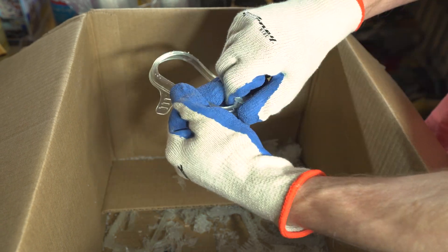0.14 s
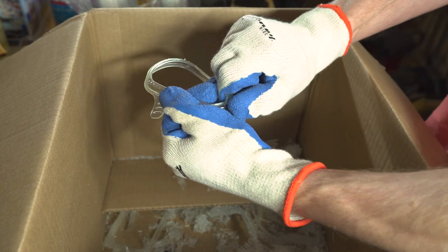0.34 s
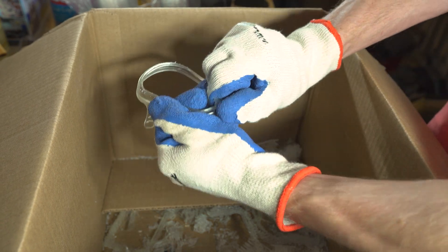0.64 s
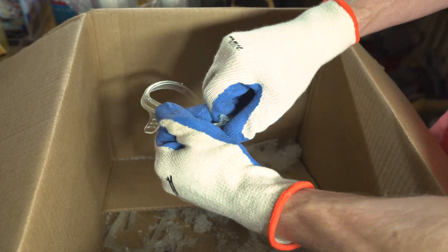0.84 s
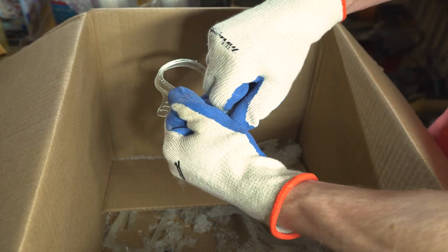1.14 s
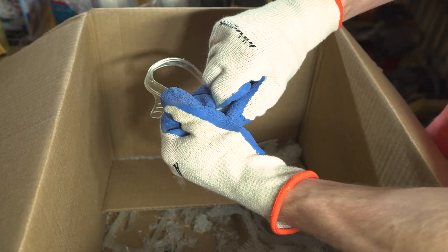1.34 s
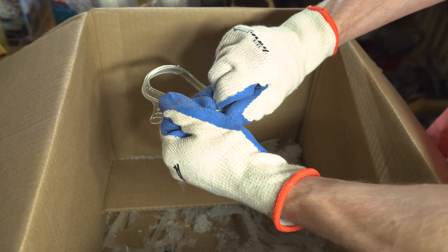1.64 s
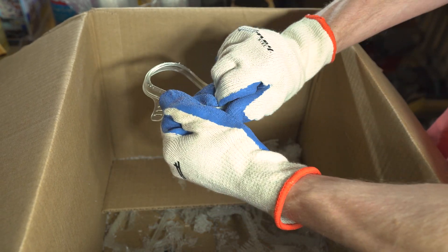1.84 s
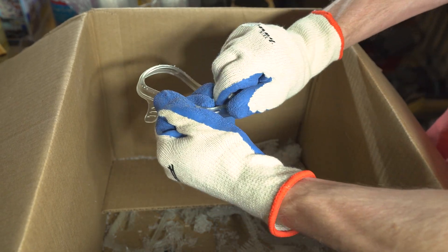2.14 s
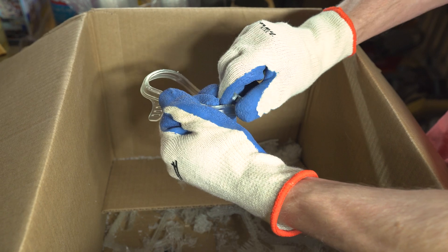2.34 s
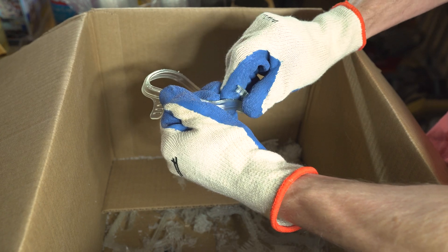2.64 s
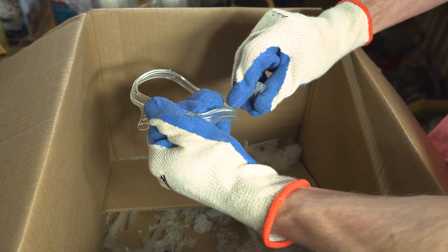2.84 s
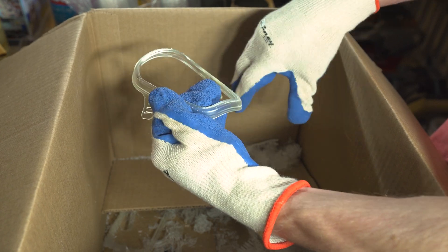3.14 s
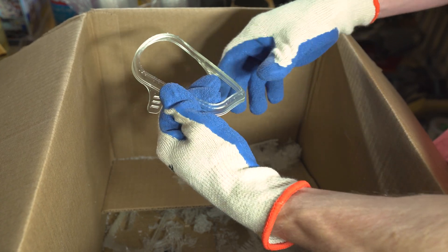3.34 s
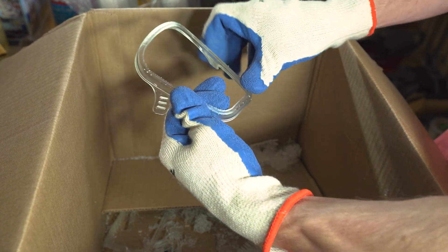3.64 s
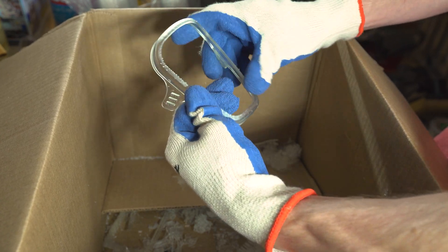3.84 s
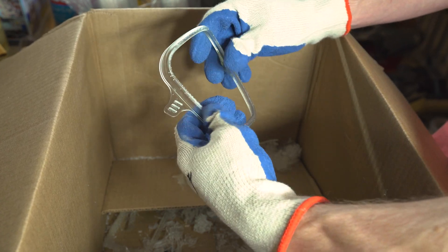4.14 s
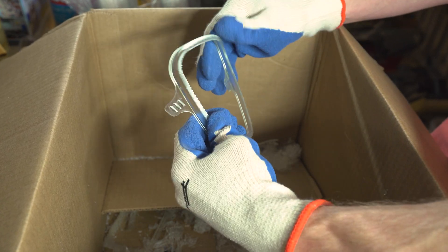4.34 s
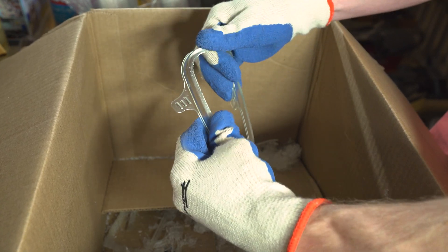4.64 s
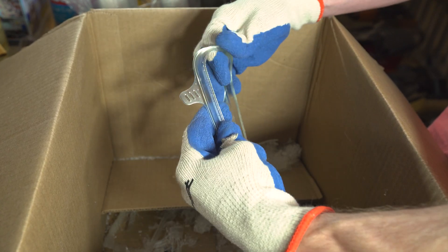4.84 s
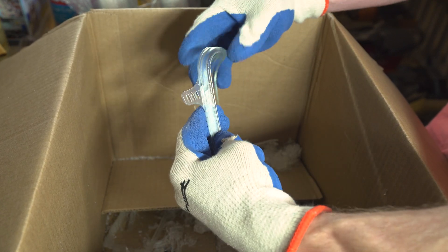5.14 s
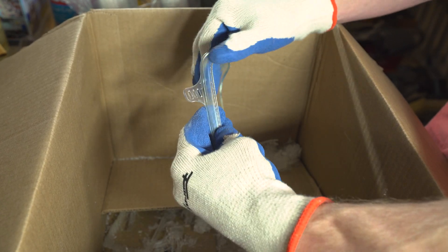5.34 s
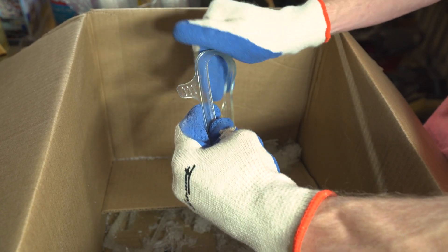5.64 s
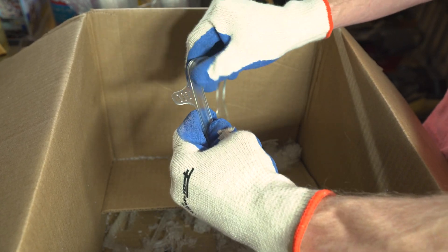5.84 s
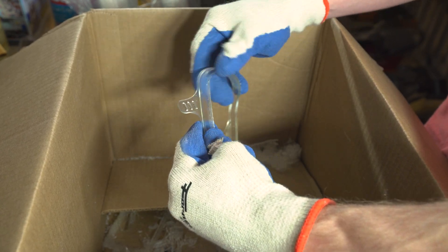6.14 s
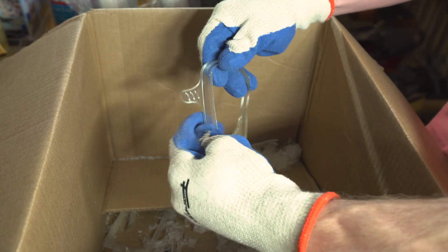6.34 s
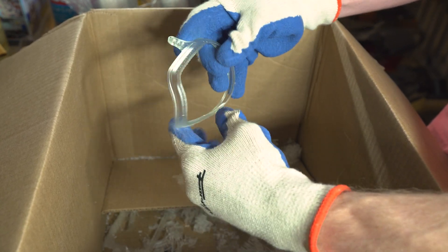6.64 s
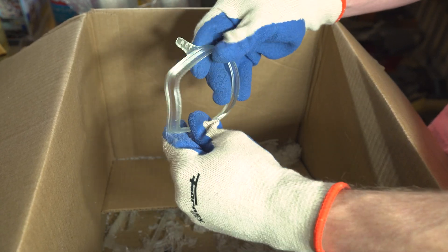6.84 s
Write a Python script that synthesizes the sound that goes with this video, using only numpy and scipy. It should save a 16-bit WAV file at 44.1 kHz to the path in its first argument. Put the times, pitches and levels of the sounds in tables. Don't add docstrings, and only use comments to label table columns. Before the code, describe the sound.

Hard resin supports are broken off by hand. Quiet scrap rattle opens; one high, needle-thin snap follows, then near two seconds a clustered crackle, later two bright snaps and small crunches, finally a lower knock-like crack. The rest is glove rubbing, squeaky-dry rustle and irregular plastic clicks, softer than the snaps. Heard close, with short reflections off box walls, a brief room tail and a quiet noise floor.

```python
import sys
import numpy as np
from scipy import signal
from scipy.io import wavfile
from scipy.ndimage import uniform_filter1d

SR = 44100
rng = np.random.default_rng(int(sys.argv[2]) if len(sys.argv) > 2 else 0)


def convert_level_to_amplitude(level_db):
    exponent = np.asarray(level_db, float) / 20
    return 10 ** exponent


def unload_wav(signal):
    wavfile.write(
        sys.argv[1],
        SR,
        np.round(np.clip(np.atleast_2d(signal).T, -1, 1) * 32767).astype(np.int16),
    )


N = 308655


def evened(x):
    return x / np.sqrt(np.mean(x ** 2) + 1e-20)


def read(points, hz):
    f, value = np.transpose(points)
    return np.interp(np.log(hz + 1), np.log(f + 1), value)


def colour(x, points):
    log_gain = np.log(convert_level_to_amplitude(read(points, abs(np.fft.fftfreq(4096, 1 / SR)))))
    taps = np.fft.ifft(np.exp(np.conj(signal.hilbert(log_gain)))).real[:1024]
    taps = taps.reshape((1,) * (x.ndim - 1) + (-1,))
    return signal.oaconvolve(x, taps, axes=-1)[..., :x.shape[-1]]


def level(starts, lengths, dbs, rise_s, t60):
    t, power = np.arange(0, N / SR + .002, .001), 0
    for start, length, db in zip(starts, lengths, dbs):
        rise = np.clip((t - start) / rise_s + .5, 0, 1)
        decay_db = 60 * np.maximum(t - start - length, 0) / t60
        power = power + (rise * convert_level_to_amplitude(db - decay_db)) ** 2
    return np.interp(np.arange(N) / SR, t, np.sqrt(power))


def likened(a, b, same):
    same = np.clip(same, 0, 1)
    return np.array([a, same * a + np.sqrt(1 - same ** 2) * b])


def grains(points, per_s, spread_db, smooth, same):
    sizes = convert_level_to_amplitude(spread_db * np.minimum(rng.exponential(1, N), 3.0))
    slips = sizes * (rng.random(N) < per_s / SR)
    slips = signal.lfilter([1], [1, -.97], slips)
    a, b = rng.standard_normal((2, N)) * (evened(slips) + smooth)
    return evened(colour(likened(a, b, same), points))


# frequency_hz, density_db (dB per Hz)
QUIET_TONE = [(12, -12), (20, -33), (44, 2.5), (130, -4.5), (337, -11), (399, -12.5), (527, -15),
              (1120, -18), (1480, -18), (2820, -22), (3440, -21.5), (7310, -25), (10800, -22), (16000, -29)]
# frequency_hz, left_right_likeness (0-1)
EAR_LIKENESS = [(60, 1.0), (180, 0.96), (550, 0.22), (1650, 0.028), (4970, 0.031), (15000, 0.089)]


def quiet():
    frames, hz = N // 256 + 5, np.fft.rfftfreq(1024, 1 / SR)
    a, b, c, d, patches = rng.standard_normal((frames, 513, 5)).T
    patches = evened(uniform_filter1d(uniform_filter1d(patches, 12, 0), 14, 1))
    z = likened(a + 1j * b, c + 1j * d, read(EAR_LIKENESS, hz)[:, None])
    z *= convert_level_to_amplitude(read(QUIET_TONE, hz)[:, None] + 0.51 * patches)
    noise = signal.istft(z, nperseg=1024, noverlap=768)[1][:, :N]
    return convert_level_to_amplitude(-54.5) * evened(noise)


# frequency_hz, t60_s
ROOM_T60 = [(300, 0.49), (1000, 0.33), (2500, 0.32), (4300, 0.42), (7000, 0.44), (12000, 0.46),
            (16000, 0.47)]


def room(x):
    taps = np.zeros((2, SR))
    at = np.arange(200, SR - 20, 12) + rng.integers(0, 12, (2, (SR - 221) // 12 + 1))
    np.put_along_axis(taps, at, rng.choice([-1., 1.], at.shape), 1)
    treble = signal.lfilter(*signal.butter(2, 1500, "high", fs=SR), taps[1] - taps[0])
    taps[1] = taps[0] + 0.53 * treble + 0.58 * taps[1]
    hz, t, z = signal.stft(taps, SR, nperseg=256)
    decay = convert_level_to_amplitude(-60 * t / read(ROOM_T60, hz)[:, None])
    tail = signal.istft(z * decay, SR, nperseg=256)[1]
    tail = tail / np.linalg.norm(tail, axis=1)[:, None]
    return signal.fftconvolve(x, tail, axes=1)[:, :N]


# delay_s, level_db
WALL_ECHOES = [
    (.0022, -5.5),
    (.0048, -4.5),
    (.0065, -7),
    (0.018, -28),
]


def box(x):
    t = np.arange(1500) / SR
    scatter_t60, scatter_db = .028, -1.5
    taps = rng.standard_normal((2, len(t))) * convert_level_to_amplitude(-60 * t / scatter_t60) * (t > 8 / SR)
    taps[1] = taps[0] + 1.14 * np.diff(taps[1], prepend=0)
    taps *= convert_level_to_amplitude(scatter_db) / np.linalg.norm(taps, axis=1)[:, None]
    for (delay, db), shifts in zip(WALL_ECHOES, rng.uniform(-0.89, 1, (len(WALL_ECHOES), 2))):
        for ear, shift in enumerate(shifts):
            taps[ear, round((delay + .0001 * shift) * SR)] += convert_level_to_amplitude(db)
    return signal.oaconvolve(x, taps, axes=1)[:, :N]


# frequency_hz, bandwidth_hz, level_db
PANELS = [(263, 22, -8), (497, 13, -1), (585, 38, 7.5), (690, 31, -1), (1004, 27, 1.5), (1460, 49, 0.5),
          (1610, 31, -12), (2020, 90, -7)]
# start_s, length_s, level_db
SCRAP_SLIDES = [
    (0.008, 0.033, -51),
    (0.047, 0.028, -52),
    (0.098, 0.085, -53),
    (0.172, 0.079, -57.5),
    (0.818, 0.095, -62),
]


def slides():
    drag, out = rng.standard_normal(SR), np.zeros(N)
    for hz, width, db in PANELS:
        r = np.exp(-np.pi * width / SR)
        poles = [1, -2 * r * np.cos(2 * np.pi * hz / SR), r * r]
        out[:SR] += convert_level_to_amplitude(db) * evened(signal.lfilter([1, 0, -1], poles, drag))
    return level(*np.transpose(SCRAP_SLIDES), 0.012, 0.15) * out / np.std(out[:SR])


# frequency_hz, level_db
CARD_TONE = [(100, -19), (250, 3), (600, -1), (900, 2), (2000, -29)]
# start_s, length_s, level_db
CARD_SHAKES = [(0.005, 0.031, -50), (0.037, 0.055, -52), (0.095, 0.12, -58), (0.82, 0.092, -59),
               (2.158, 0.016, -53), (2.236, 0.01, -58), (3.396, 0.04, -46), (3.696, 0.028, -66),
               (4.25, 0.066, -65), (4.933, 0.011, -46.5), (5.507, 0.011, -49.5), (5.62, 0.14, -61)]


def cardboard():
    gain = level(*np.transpose(CARD_SHAKES), 0.019, 0.079)
    return gain * grains(CARD_TONE, 140, 3.5, 1.0, 0.93)


# frequency_hz, level_db
RUSTLE_TONE = [(500, -9.5), (1000, -6), (1500, -0.5), (2000, 0.5), (2800, -3.5), (4000, -7), (8000, -21.5)]
# frequency_hz, level_db
HISS_TONE = [(2000, -23.5), (4000, -2.5), (6500, -0.5), (9000, -4), (12000, -8.5), (15000, -7),
             (16500, -43)]
# start_s, length_s, part_rustle_db, glove_hiss_db (relative to the rustle)
GLOVE_STROKES = [(0.0, 0.056, -50, -4), (0.103, 0.14, -57.5, 1), (0.492, 0.0077, -49, -1.5),
                 (0.798, 0.15, -56.5, 0.5), (0.965, 0.28, -66.5, -1), (1.262, 0.037, -61.5, -7),
                 (1.713, 0.088, -75.5, 14.5), (2.317, 0.004, -59, -2), (2.331, 0.004, -57, -2),
                 (2.47, 0.15, -59, -4), (3, .2, -62, 2), (3.317, 0.2, -63, -13), (3.614, 0.04, -70, -13),
                 (3.689, 0.026, -52.5, -3), (3.755, 0.18, -82, -10), (3.936, 0.087, -55.5, 4.5),
                 (4.045, 0.34, -53.5, -2.5), (4.243, 0.074, -48.5, -4), (4.418, 0.031, -54, 6),
                 (4.53, 0.27, -61, 0.5), (4.839, 0.055, -54, 2.5), (4.895, 0.065, -51.5, 5),
                 (4.982, 0.035, -45, -3), (5.024, .025, -48, -3), (5.093, 0.14, -68, -2),
                 (5.662, 0.083, -52, 3), (5.886, 0.016, -49.5, -4), (5.974, 0.053, -56, 12.5),
                 (6.142, 0.05, -56.5, 0), (6.443, 0.028, -48, -3), (6.505, 0.1, -47.5, 1),
                 (6.907, 0.033, -62.5, 7)]
GLOVE_SHIFTS = [
    (0.275, 0.14, -64, -3),
    (0.523, 0.17, -67.5, 3.5),
    (1.53, 0.17, -80, 8),
    (5.77, 0.032, -68.5, 11),
    (6.256, 0.13, -79, 11),
    (6.62, 0.034, -65, 4),
    (6.807, 0.019, -62.5, 1),
]


def gloves():
    start, length, db, hiss_db = np.transpose(GLOVE_STROKES + GLOVE_SHIFTS)
    rise_s, t60 = 0.013, 0.073
    rest = level([3.62], [N / SR], [-62], 0.24, 1)
    rustle_gain = level(start, length, db, rise_s, t60) + rest
    hiss_gain = level(start, length, db + hiss_db, rise_s, t60) + rest
    rustle = rustle_gain * grains(RUSTLE_TONE, 500, 4.1, 1.0, 0.81)
    return rustle + hiss_gain * grains(HISS_TONE, 700, 2.9, 1.0, 0.38)


PAN_DB, PAN_SPREAD_DB = -0.7, 0.4


def panned(pan_db):
    return convert_level_to_amplitude([[pan_db / 2], [-pan_db / 2]])


def rings(t, hz, t60, spread, chance):
    steps = np.linspace(-1.5, 1.5, chance.shape[1]) + .25 * chance[0]
    f = np.minimum(hz * np.exp(spread * steps), 16000)[:, None]
    decays = t60 * np.exp(0.2 * chance[2][:, None])
    modes = np.cos(2 * np.pi * (f * t + .04 * chance[1][:, None])) * convert_level_to_amplitude(-60 * t / decays)
    return modes.sum(0)


def snaps(rows, tone, strut_db, part_t60, part_db, crack_db, crack_t60=.006):
    out, t = np.zeros((2, N + 1500)), np.arange(1500) / SR
    splinters = rng.standard_normal((len(rows), len(t))) * convert_level_to_amplitude(-60 * t / crack_t60)
    splinters = splinters / 2.6 + (t == 0)
    chance = np.clip(rng.standard_normal((len(rows), 2, 3, 5)), -1.5, 1.5)
    pans = PAN_DB + PAN_SPREAD_DB * rng.standard_normal(len(rows))
    struts = [rings(t, row[2], .0025, 0.099, a) for row, (a, b) in zip(rows, chance)]
    cracks = colour(splinters + convert_level_to_amplitude(strut_db) * np.array(struts), tone)
    for (start, peak_db, _, low_db, low_hz), crack, (_, b), pan_db in zip(rows, cracks, chance, pans):
        crack = crack * convert_level_to_amplitude(peak_db + crack_db) / abs(crack).max()
        part = rings(t, low_hz, part_t60, 0.14, b) * (1 - np.exp(-t / 0.00016))
        at = round(start * SR)
        out[:, at:at + len(t)] += (crack + convert_level_to_amplitude(low_db + part_db) * part) * panned(pan_db)
    return out[:, :N]


# frequency_hz, level_db
CRACK_TONE = [(1500, -50), (3500, -7.5), (4600, -3.5), (5800, -0.5), (7000, 0.5), (11000, -2.5),
              (15000, -6.5), (16500, -17)]
# start_s, crack_peak_db, part_level_db, part_ring_hz
GRIPPING = [(0.015, -36.5, -42, 1900), (0.4896, -41, -61, 1420), (0.666, -46, -59, 853),
            (0.934, -40, -51, 2500), (0.9931, -41.5, -54, 820), (1.06, -39, -59, 1330),
            (1.1934, -40, -53.5, 1250), (1.3205, -48, -43, 1460), (1.5363, -50, -48, 1900),
            (1.6158, -47, -50, 1780), (1.7439, -48, -55, 2280), (1.794, -43, -48.5, 2500),
            (1.8817, -49, -54, 2550), (2.3508, -37.5, -48, 2200), (2.5094, -31, -46.5, 2100),
            (2.5574, -44, -45, 3080), (2.5753, -30, -51.5, 1380), (2.6531, -31, -49, 1630),
            (2.6943, -34, -52, 1670), (3.0268, -40, -42, 1300), (3.1094, -59, -47, 1630),
            (3.1882, -42, -46.5, 1760), (3.3903, -37, -35.5, 1690), (3.4044, -37.5, -39, 930),
            (3.4172, -39.5, -38.5, 2000), (3.524, -38, -59, 1450), (3.6594, -56, -48.5, 1800),
            (3.6922, -36, -38.5, 810), (3.9317, -40, -51, 1830), (4.0424, -36, -55, 1800)]
TURNING = [(3.945, -37, -51, 2920), (4.0737, -49, -46, 1850), (4.2128, -46, -47, 1510),
           (4.3498, -46, -47, 2430), (4.4258, -44, -47, 1450), (4.5388, -43, -49, 1530),
           (4.6571, -41, -50, 3000), (4.693, -52, -52, 2100), (4.0996, -47, -43.5, 1400),
           (4.115, -54, -59, 1920), (4.158, -46, -43, 2480), (4.2763, -35, -39, 1150),
           (4.3003, -31, -33.5, 1950), (4.3598, -43, -44, 1490), (4.5483, -32, -42, 2220),
           (4.5747, -45, -42, 1990), (4.592, -29, -62, 1490), (4.6305, -51, -48, 1610),
           (4.7294, -40, -50, 2170), (4.8225, -35, -45, 2040), (4.891, -29.5, -45, 2900),
           (4.9055, -25.5, -29.5, 2480), (4.9393, -34, -44, 3000), (4.952, -42, -46, 2100),
           (4.9307, -29, -35, 2200), (4.9413, -32, -38, 2200), (4.9837, -36, -32, 2280),
           (4.9944, -34, -37, 2160), (5.004, -44, -35, 2300), (5.0098, -42, -41, 2700),
           (5.0236, -36, -35, 2400), (5.026, -50, -38, 1500), (5.0415, -45, -40, 2300),
           (5.0478, -28, -29.5, 2550), (5.124, -40, -42, 3670), (5.129, -44, -52, 4500),
           (5.1366, -29, -43, 1690), (5.157, -39, -67, 2040), (5.3022, -42, -51.5, 2260)]
FEELING = [(5.5197, -45, -47, 1200), (5.5265, -40, -44.5, 1300), (5.826, -42, -56, 3000),
           (6.28, -47, -54, 1990), (6.4246, -46, -51, 2180), (6.512, -52, -56, 1550),
           (6.9415, -45, -43, 2360), (5.5893, -38.5, -41, 3100), (5.6394, -29.5, -36, 1790),
           (5.683, -36, -46, 2400), (5.708, -38, -40, 2330), (5.7356, -53, -39, 2220),
           (5.793, -46, -48, 1750), (5.889, -33.5, -38.5, 2360), (5.948, -34, -63, 2290),
           (5.962, -41, -44.5, 2470), (5.9772, -44, -45, 2560), (6.145, -44, -63, 1580),
           (6.1694, -36.5, -52, 1650), (6.268, -42, -61, 1950), (6.333, -41, -50, 2020),
           (6.3884, -42, -46, 2080), (6.4395, -37, -43, 1870), (6.4625, -36, -42, 1800),
           (6.5225, -35, -39.5, 2000), (6.58, -37, -38.5, 1460), (6.681, -46, -46.5, 2140),
           (6.7332, -43, -43, 1950), (6.908, -34, -61, 2370), (6.9337, -32, -42.5, 1970),
           (6.978, -46, -45, 1970)]


def ticks():
    touches = GRIPPING + TURNING + FEELING
    stub_hz = 6400 * np.exp(0.28 * np.clip(rng.standard_normal(len(touches)), -2, 2))
    rows = [(start, peak_db, hz, low_db, low_hz)
            for (start, peak_db, low_db, low_hz), hz in zip(touches, stub_hz)]
    return snaps(rows, CRACK_TONE, -13.0, 0.0042, 0.87, 0.63, crack_t60=0.009)


# frequency_hz, level_db, t60_s
BODY_MODES = [(342, -6, 0.11), (630, -12, 0.04), (833, -5, 0.055), (862, 4, 0.17), (930, -7.5, 0.13),
              (1080, -21, 0.17), (1750, -25, 0.035), (1880, -4, 0.04), (2300, -14, 0.059)]
# start_s, level_db
PART_KNOCKS = [
    (3.2725, -40),
    (3.287, -35.5),
    (3.306, -45.5),
    (3.321, -45),
    (3.392, -57),
    (3.406, -53),
    (3.419, -53),
    (2.0125, -49),
    (2.043, -58),
]


def body():
    out, t = np.zeros(N + 9000), np.arange(9000) / SR
    variation = rng.standard_normal((len(PART_KNOCKS), len(BODY_MODES)))
    for (start, db), vary in zip(PART_KNOCKS, variation):
        grip = uniform_filter1d(rng.standard_normal((len(BODY_MODES), len(t))), size=300)
        ring = 0
        for (hz, mode_db, t60), v, g in zip(BODY_MODES, vary, grip):
            gain = convert_level_to_amplitude(mode_db + 4.1 * v - 60 * t / t60 + 5.0 * evened(g))
            ring = ring + gain * np.sin(2 * np.pi * hz * (1 + 0.0204 * v) * t)
        out[round(start * SR):][:len(t)] += convert_level_to_amplitude(db) * ring
    return out[:N] * panned(PAN_DB)


# start_s, level_db, pitch_hz, t60_s
BLUNT_BLOWS = [(2.158, -43, 85, 0.13), (3.2719, -1.5, 1850, 0.0047), (3.2728, -16, 750, 0.0084),
               (3.274, -33, 340, .04), (3.401, -42, 330, .03), (3.277, -24, 3600, .01),
               (3.2864, -14, 2230, 0.0086), (4.2999, -22, 2000, 0.0046), (5.024, -19.5, 1980, 0.005),
               (5.048, -19.5, 2300, 0.003), (5.8886, -25, 2180, 0.014), (1.3205, -34.5, 1660, 0.016),
               (0.0085, -32, 440, .014), (0.0148, -26.5, 605, 0.022), (0.0225, -32, 516, .025),
               (0.0335, -32, 685, .025), (0.043, -34, 560, 0.018), (0.0525, -31, 460, .016),
               (0.0645, -32, 640, .025), (0.075, -34, 530, .02), (2.166, -38, 283, .03),
               (2.351, -42.5, 1480, .02), (5.026, -32.5, 1490, 0.058), (4.926, -38, 700, .02),
               (4.7, -29, 4600, .004), (5.6, -31, 6000, .004), (3.028, -33.5, 1850, .015),
               (2.0116, -16, 8200, .006), (2.0304, -14, 9700, .009), (2.0302, -11, 6800, 0.0044),
               (2.0417, -11, 6700, .005), (2.7525, -18.5, 1700, 0.014), (2.0435, -26, 1650, .012),
               (2.0352, -27, 1800, .006), (5.639, -34, 3600, .006), (5.6405, -37, 900, .015),
               (5.74, -41, 900, .02), (4.9415, -38, 800, .02), (4.994, -39, 800, .02),
               (5.035, -40, 750, .03), (1.536, -45, 2000, .012), (0.017, -34, 380, .03),
               (4.1155, -38, 1900, .012), (4.3415, -39, 4500, .004), (5.991, -40, 2600, .008),
               (5.997, -42, 2300, .008), (6.533, -36, 2300, .008)]


def blows():
    out, t = np.zeros(N + 9000), np.arange(9000) / SR
    for start, db, hz, t60 in BLUNT_BLOWS:
        blow = convert_level_to_amplitude(db - 60 * t / t60) * np.sin(2 * np.pi * hz * t)
        out[round(start * SR):][:len(t)] += blow * np.minimum(t * hz, 1)
    return out[:N] * panned(PAN_DB)


# frequency_hz, level_db
BRIGHT_TONE = [(1500, -29), (3500, -8), (6000, -3), (8500, -2), (12000, -4.5), (15000, -4.5), (16500, -25)]
# start_s, length_s, level_db
CRUMBLING = [
    (2.823, .005, -34),
    (2.831, .004, -34),
    (2.929, 0.0026, -46),
    (2.938, .002, -41),
    (0.7097, 0.0015, -27.5),
    (0.742, 0.012, -49),
    (2.022, .002, -29),
    (2.0245, .002, -36),
    (2.756, 0.0028, -37),
    (2.776, 0.0024, -35),
]


def crumbles():
    gain = level(*np.transpose(CRUMBLING), 0.0031, 0.0099)
    return gain * grains(BRIGHT_TONE, 2520, 5.8, 0.36, 0.45)


# frequency_hz, level_db
FINE_TONE = [(1500, -55), (3800, -12), (4600, -6), (6200, -10), (8500, -6), (11500, -4), (15000, -5.5),
             (16800, -13)]
# start_s, crack_peak_db, strut_ring_hz, part_level_db, part_ring_hz
FINEST_TIP = [
    (0.7081, -7, 11000, -37, 1880),
    (0.7133, -17.5, 9100, -56, 1940),
    (0.7715, -40, 4000, -43.5, 3300),
]


def finest_tip():
    return snaps(FINEST_TIP, FINE_TONE, -5.5, 0.0054, 0.72, -0.2)


# start_s, crack_peak_db, strut_ring_hz, part_level_db, part_ring_hz
THIN_TIPS = [
    (2.7518, -4, 8700, -28.5, 2000),
    (2.7698, -4, 10800, -24.5, 2130),
    (2.8275, -32, 9710, -37.5, 2700),
    (2.834, -27, 11900, -47.5, 500),
    (2.9175, -24, 11100, -50, 1150),
    (2.931, -39, 9000, -42, 2600),
    (2.9364, -22, 8800, -43, 2600),
]


def thin_tips():
    return snaps(THIN_TIPS, BRIGHT_TONE, -19.0, 0.0085, 0.63, -0.16)


# frequency_hz, level_db
DULL_TONE = [(300, -20), (900, -19), (1800, 8), (2800, -2.5), (4500, 0.5), (6500, -5.5), (10000, -6.5),
             (16500, -25)]
# start_s, crack_peak_db, strut_ring_hz, part_level_db, part_ring_hz
THICK_PIECE = [
    (3.2722, -13, 6250, -24, 1760),
    (3.2768, -17, 5800, -27, 1650),
    (3.2862, -21, 5370, -31, 2410),
    (3.294, -40, 3000, -37, 890),
]


def thick_piece():
    return snaps(THICK_PIECE, DULL_TONE, -22.5, 0.0035, 3.8, -0.86)


# start_s, crack_peak_db, strut_ring_hz, part_level_db,
# part_ring_hz
STRUT_BREAKS = [(2.0116, -5, 8400, -28, 1990), (2.0168, -19, 9100, -46, 1095),
                (2.0183, -15, 9000, -53, 2000), (2.0302, -5.5, 11200, -40, 3040),
                (2.0351, -10, 6700, -56, 1900), (2.0416, -5, 6700, -38, 1540),
                (2.0469, -23, 6860, -52, 1730), (2.0487, -14, 6500, -41, 2040),
                (2.0618, -16, 6480, -49, 2710), (2.7312, -33, 8100, -70, 1800),
                (2.855, -26, 4800, -43, 1920), (2.912, -16.5, 5300, -31, 1940)]


def breaks():
    return snaps(STRUT_BREAKS, CRACK_TONE, -22.0, 0.0075, 1.0, -0.24)


def scene():
    high_pass = signal.butter(2, 330, "high", fs=SR)
    hits = signal.lfilter(*high_pass, breaks() + thin_tips() + thick_piece() + ticks())
    hits = hits + finest_tip() + crumbles()
    heard = hits + box(hits) + convert_level_to_amplitude(-1.2) * room(hits)
    return heard + gloves() + cardboard() + quiet() + body() + blows() + slides()


def band_limit(x):
    return signal.sosfilt(signal.butter(12, 16830, fs=SR, output="sos"), x)


def record(dry):
    edge = signal.firwin(255, 16200, window=("kaiser", 7), fs=SR)
    mix = signal.oaconvolve(dry, edge[None], "same")
    return band_limit(mix)


dry = scene()
out = record(dry)
unload_wav(out)
```